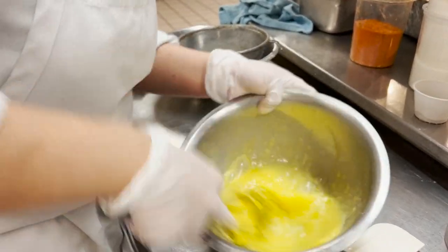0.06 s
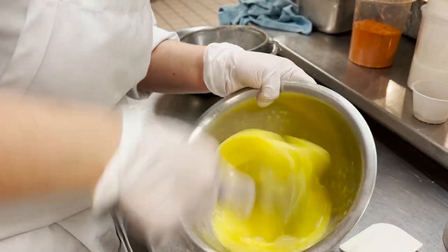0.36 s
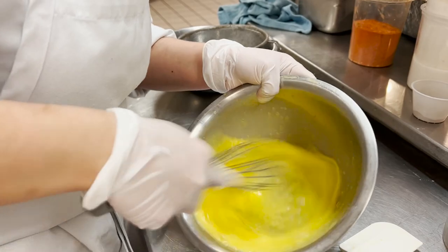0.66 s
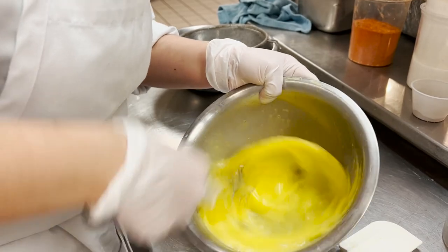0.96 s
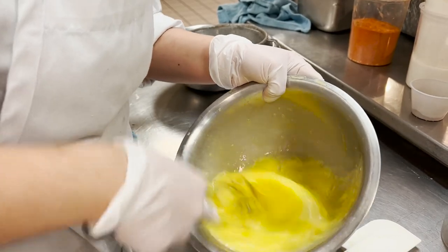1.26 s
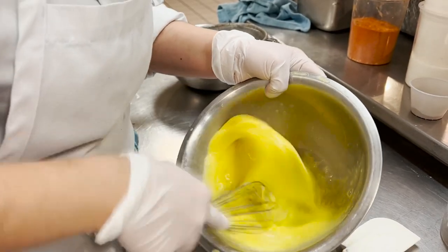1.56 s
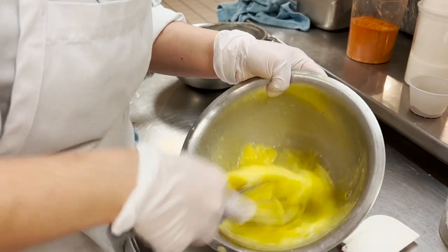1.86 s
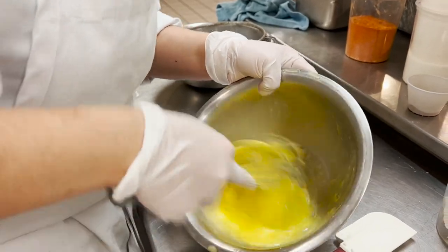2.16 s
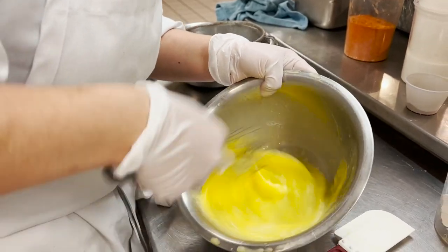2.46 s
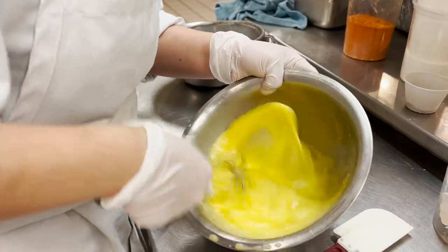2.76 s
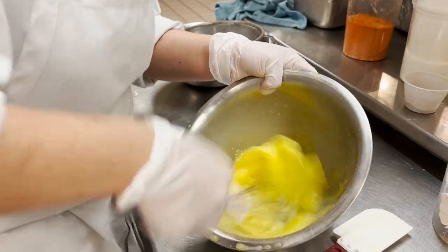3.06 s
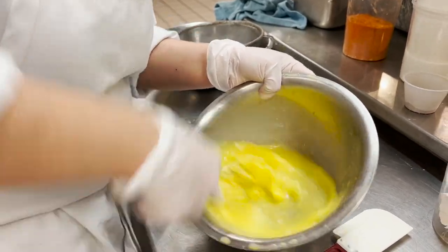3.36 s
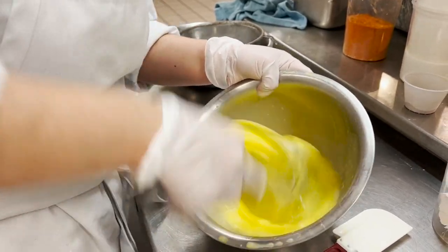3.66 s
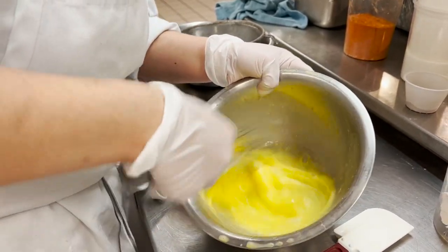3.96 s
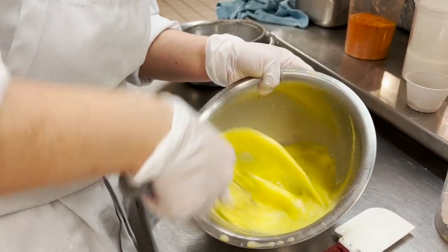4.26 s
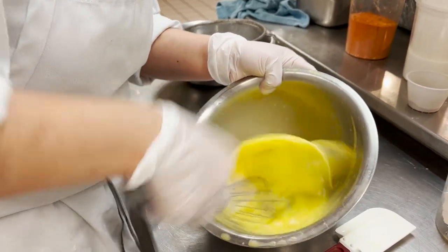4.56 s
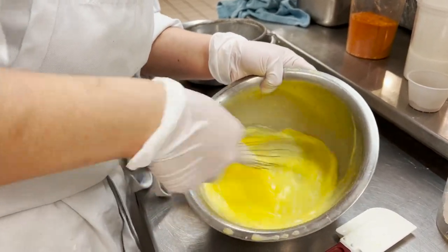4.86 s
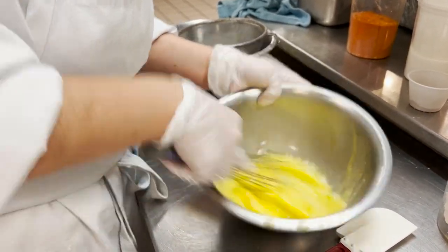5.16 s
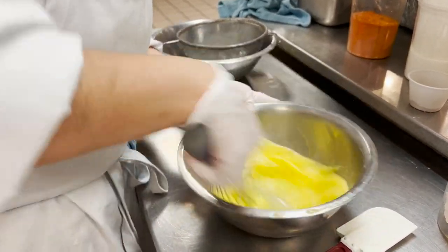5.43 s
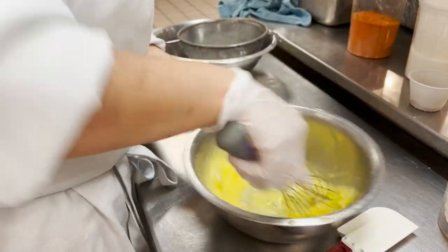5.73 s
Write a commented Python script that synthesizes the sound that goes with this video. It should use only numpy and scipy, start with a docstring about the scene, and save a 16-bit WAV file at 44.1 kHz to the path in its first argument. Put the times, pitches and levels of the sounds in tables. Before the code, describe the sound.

A wire whisk beats eggs in a steel bowl at about six strokes a second, each stroke a metallic click and clatter with a brief shimmer of wires. The egg squelches and plops softly underneath. Near the end the strokes turn into lighter, quicker, uneven taps as the bowl is set down with a faint scrape and a clink. Kitchen ventilation hums steadily behind, and the microphone is close.

```python
"""A wire whisk beats eggs in a hand-held steel bowl, about six strokes a second, then fades into lighter,
quicker, uneven taps as the bowl is set down with a scrape and a clink. Each stroke is a train of impacts
that excites the modes of bowl and wires; the egg damps the steel, and the freed wires ring on. The egg
squelches, and air pockets in it plop and snap. Kitchen ventilation hums behind as a diffuse field, and
a close pair of microphone ports hears it all."""
import sys
import numpy as np
from scipy import signal
from scipy.fft import rfft, irfft, next_fast_len
from scipy.io import wavfile
from scipy.ndimage import map_coordinates

SR = 44100
rng = np.random.default_rng(int(sys.argv[2]) if len(sys.argv) > 2 else 0)


def wrap_up_sound(samples):
    """Save the sound to the file named by the first command line argument, as 16-bit audio."""
    columns = np.atleast_2d(samples).T
    # keep every value between -1 and 1, then stretch to whole-number steps
    tamed = np.clip(columns, -1, 1)
    steps = np.round(tamed * 32767).astype(np.int16)
    wavfile.write(sys.argv[1], SR, steps)


N = 255471


def amp(db):
    """Amplitude ratio of a level in decibels."""
    return 10 ** (np.asarray(db) / 20)


def unit(x):
    """Normalisation to rms 1."""
    return x / np.sqrt(np.mean(x ** 2) + 1e-20)


def burst(x, db):
    """Energy normalisation: x gets the energy of 20 ms at this level."""
    return amp(db) * x * np.sqrt(.02 * SR / np.sum(x ** 2))


def add(track, start_s, x):
    """Superposition of x on the track, in place."""
    part = track[..., max(0, round(start_s * SR)):][..., :x.shape[-1]]
    part += x[..., :part.shape[-1]]


def along(points, hz):
    """Interpolation of (f/Hz, value) points on a logarithmic frequency axis."""
    f, values = np.transpose(points)
    return np.interp(np.log(hz + 1), np.log(f + 1), values)


def wobble(per_s):
    """Slow random modulation: a spline through Gaussian knots."""
    knots = rng.standard_normal(int(N * per_s / SR) + 4)
    return map_coordinates(knots, [np.arange(N) * per_s / SR])


def scattered(hz, octaves):
    """Log-normal scatter of a frequency."""
    return hz * 2 ** (octaves * rng.standard_normal())


def filtered(x, response):
    """Linear filtering: the spectrum of x times a complex frequency response."""
    n = x.shape[-1]
    padded = next_fast_len(n + 8192)
    hz = np.fft.rfftfreq(padded, 1 / SR)
    return irfft(rfft(x, padded) * response(hz), padded)[..., :n]


def coloured(x, spectrum):
    """Zero-phase shaping by a spectral envelope of (f/Hz, level/dB) points."""
    return filtered(x, lambda hz: amp(along(spectrum, hz)))


def resonate(x, modes):
    """Modal superposition: x drives damped resonators of alternating polarity."""
    def response(f):
        return sum((-1) ** k * amp(db) * 1j * f * width / (hz * hz - f * f + 1j * f * width)
                   for k, (hz, width, db) in enumerate(modes))
    return filtered(x, response)


def smear(x, t60, channels):
    """Statistical reverberation: noise carries the energy of x, falling 60 dB in t60 seconds."""
    decay = amp(-120 * np.arange(len(x)) / SR / t60)
    energy = np.abs(signal.fftconvolve(x ** 2, decay / decay.sum())[:len(x)])
    return np.sqrt(energy) * rng.standard_normal((channels, len(x)))


# Likeness of left and right in the diffuse field: f/Hz, coherence
COHERENCE = [(60, .99), (150, .95), (300, .85), (600, .5), (1000, .25), (6500, .2), (8500, .65),
             (10000, .9), (16000, .9)]

def diffuse(pair):
    """Diffuse-field coherence: two independent signals mix as mid and side into left and right."""
    def weights(hz):
        angle = np.arccos(np.clip(along(COHERENCE, hz), -1, 1)) / 2
        return np.array([np.cos(angle), np.sin(angle)])
    mid, side = filtered(pair, weights)
    return np.array([mid + side, mid - side])


def echoes(x, near_db, near_t60, room_db, room_t60):
    """Direct and reverberant sound: quick reflections in the bowl, then the kitchen's tail."""
    near = amp(near_db) * smear(x, near_t60, channels=2)
    room = amp(room_db) * smear(x, room_t60, channels=2)
    return x + diffuse(near + room)


def grains(spectrum, per_s, spread_db):
    """Shot noise: dense tiny impacts of uneven size, in stereo at rms 1."""
    hits = (rng.uniform(0, 1, (2, N)) < per_s / SR) * rng.standard_normal((2, N))
    sizes = amp(spread_db * rng.standard_normal((2, N)))
    return unit(diffuse(coloured(hits * sizes, spectrum)))


# Rumble and hiss of air in the hood: f/Hz, relative level/dB
HOOD_RUMBLE = [(20, -30), (40, -14), (65, -0.5), (88, -6), (120, 1.5), (145, -1), (240, 2), (310, -1),
               (410, -3), (600, -7.5), (850, -14), (1500, -13)]
HOOD_HISS = [(1000, -26), (1600, 1), (2500, 3.5), (4000, -2), (6500, -3), (8500, -9.5), (12000, -18),
             (16000, -41)]
# Duct and fan resonances: f/Hz, bandwidth/Hz, relative level/dB
DUCT_MODES = [(102.2, 1.14, -40), (112.5, 6, -45.5), (167.3, 2.9, -40.5), (200.9, 19.8, -28.5),
              (228.6, 22.5, -33.5), (265.7, 12.6, -37.5), (288.1, 4, -46.5), (360.4, 5.3, -42)]

def ventilation():
    """Flow noise: broadband from the hood, narrowband where fan and duct resonate."""
    def duct_response(f):
        power = sum(amp(2 * db) / width / (1 + ((f - hz) / (0.5 * width)) ** 2) ** 2
                    for hz, width, db in DUCT_MODES)
        return np.sqrt(power)
    rumble = coloured(rng.standard_normal((2, N)), HOOD_RUMBLE)
    rumble = filtered(rumble, lambda hz: 1 / (1 + (hz / 1700) ** 6))
    hiss = coloured(rng.standard_normal((2, N)), HOOD_HISS)
    hum = filtered(rng.standard_normal((2, N)), duct_response)
    return diffuse(amp(-27.5) * unit(rumble) + amp(-40) * unit(hiss) + amp(-27) * unit(hum))


# Spectrum of wire sliding on steel: f/Hz, relative level/dB
FRICTION_SPECTRUM = [(1500, 0), (4000, -5), (8000, -2), (11000, -4), (15500, -9)]

def scrape():
    """Stick-slip friction: the wires catch and slide on the steel as the bowl is set down."""
    level_db = np.interp(np.arange(N) / SR, [5.0, 5.1, 5.3], [-80, -43, -41])
    slips = amp(2.2 * wobble(60)) * grains(FRICTION_SPECTRUM, per_s=1600, spread_db=3.5)
    return amp(level_db) * slips


def damped_tone(t, hz, t60, rise_s):
    """Free vibration of one mode: a sinusoid that rises quickly and decays exponentially."""
    return np.sin(2 * np.pi * hz * t) * amp(-60 * t / t60) * (1 - np.exp(-t / rise_s))


def clink():
    """Impact excitation: one mode of the steel bowl rings briefly as it settles."""
    out, t = np.zeros((2, N)), np.arange(SR // 5) / SR
    note = amp(-17) * damped_tone(t, hz=2360, t60=.03, rise_s=0.00078)
    add(out, start_s=5.569, x=note)
    return out


# Spectrum of frothing egg: f/Hz, relative level/dB
FROTH_SPECTRUM = [(200, -24), (450, -5), (900, -3.5), (1550, 5.5), (2500, -9), (6000, -9), (9000, -16),
                  (15500, -28)]

def squelch():
    """Modulated shot noise: the flung egg froths as it falls back, most 70 ms after each stroke."""
    t = np.arange(N) / SR
    flow = 0.69 + sum(np.exp(-((t - start - .07) / 0.059) ** 2) for start, *_ in STROKES)
    level_db = -45.5 + 3.9 * wobble(25)
    return amp(level_db) * unit(flow) * grains(FROTH_SPECTRUM, per_s=2200, spread_db=2.5)


# Wet clicks of the egg: t/s, level/dB
WET_CLICKS = [(1.206, -20), (1.693, -19), (1.85, -14), (2.682, -20), (2.864, -11.5), (2.8944, -19),
              (3.3552, -11), (3.559, -13.5), (4.564, -20)]

def wet_clicks():
    """Transient radiation: small air pockets snap open, each a heavily damped tone and a noise pulse."""
    out, t = np.zeros((2, N)), np.arange(SR // 30) / SR
    for start, db in WET_CLICKS:
        hz = scattered(1300, octaves=0.21)
        pop = np.sin(2 * np.pi * hz * t) * np.exp(-t * hz / 2)
        snap = 0.46 * rng.standard_normal(len(t)) * np.exp(-t / 0.00059)
        snap = echoes(snap, near_db=0, near_t60=.03, room_db=-15, room_t60=.2)
        add(out, start, amp(db) * (pop + snap) / 2)
    return out


# Air pockets that the whisk traps in the egg: t/s, level/dB, f/Hz
AIR_POCKETS = [(0.6, -10, 404), (0.944, -15.5, 494), (1.421, -21, 504), (1.591, -11.5, 391),
               (1.911, -18, 407), (2.253, -17.5, 426), (3.333, -18, 450), (3.725, -19, 522),
               (5.343, -18.5, 685)]

def plops():
    """Bubble resonance: trapped air rings low and is quickly damped by the viscous egg."""
    out, t = np.zeros(N), np.arange(SR // 8) / SR
    for start, db, hz in AIR_POCKETS:
        add(out, start, amp(db) * damped_tone(t, hz, t60=0.085, rise_s=0.00082))
    return out


def contact_force(t, length_s, count=8):
    """Impact train: a sharp first touch, then wire after wire, swelling early, each chattering."""
    place = (np.arange(count) + rng.uniform(0, 1, count)) / count
    swell = 1 + 1.2 * np.sin(np.pi * place ** .75) ** 2
    sizes = swell * amp(2 * rng.standard_normal(count))
    place[0], sizes[0] = 0, amp(7)
    taps = np.bincount((place * length_s * SR).astype(int), sizes, len(t))
    return smear(taps, t60=0.0075, channels=1)[0]


def with_mode(sound, force, hz, width_hz, mode_db):
    """Selective excitation: where the wires land decides which mode stands out of the rest."""
    mode = resonate(force, [(hz, width_hz, 0)])
    return unit(sound) + amp(mode_db) * unit(mode)


def wire_twang(force):
    """Damped wire modes: every loop is bent differently, so each stroke excites its own set."""
    modes = [(hz, 140, 0) for hz in rng.uniform(2500, 15500, size=18)]
    return amp(-7) * unit(resonate(force, modes))


# Spectrum of the freely ringing wires: f/Hz, relative level/dB
RING_SPECTRUM = [(1200, -6), (2500, -8.5), (5300, -2), (6500, 2), (7900, -1), (9000, -8), (15000, -31)]

def wire_ring(t, t60):
    """Modal overlap: the freed loops ring in so many close modes that they blur into a shimmer."""
    shimmer = diffuse(coloured(rng.standard_normal((2, len(t))), RING_SPECTRUM))
    return unit(shimmer) * amp(-60 * t / t60) * (1 - np.exp(-t / 0.0017))


# Modes of the egg-filled bowl and of its steel wall: f/Hz, bandwidth/Hz, relative level/dB
BOWL_MODES = [(290, 70, -4), (400, 90, 0), (510, 90, -4), (630, 100, -7), (860, 160, -10)]
WALL_MODES = [(734, 50, -10), (995, 97, -1), (1228, 107, 4), (1605, 270, 5), (1790, 290, 2.5),
              (2297, 280, 4.5)]
# Spectra of wires striking steel, upper middle range and treble: f/Hz, relative level/dB
CLATTER_SPECTRUM = [(1700, -21), (2700, -1.5), (3200, -1.5), (4000, -0.5), (5200, -9.5), (6000, -18),
                    (7500, -9.5)]
CLICK_SPECTRUM = [(4000, -7.5), (5800, -2.5), (6600, -0.5), (7700, -1.5), (8700, 0), (11000, 0.5),
                  (13000, -19), (15500, -14)]
# Whisk strokes: t/s, contact duration/s, level/dB, bareness (0 deep in egg, 1 on bare steel)
STROKES = [(0.0538, 0.011, -21.9, 0.57), (0.2542, 0.007, -22, 0.78), (0.4254, 0.011, -19.5, 0.4),
           (0.598, 0.017, -19.5, 0.21), (0.765, 0.012, -19, 0.64), (0.9338, 0.018, -20, 0.19),
           (1.0965, 0.015, -19, 0.53), (1.2592, 0.018, -25.5, 0.19), (1.4175, 0.012, -19, 0.25),
           (1.5855, 0.015, -20.5, 0.14), (1.743, 0.01, -18.9, 0.4), (1.907, 0.014, -24.5, 0.19),
           (2.0889, 0.0072, -22.5, 0.5), (2.245, 0.011, -22.5, 0.32), (2.4126, 0.014, -23, 0.33),
           (2.5854, 0.011, -23.5, 0.6), (2.766, 0.006, -32.5, 0.24), (2.928, 0.016, -25, 0.13),
           (3.1055, 0.017, -25.5, 0.44), (3.329, 0.017, -21, 0.45), (3.5303, 0.021, -23, 0.47),
           (3.719, 0.019, -23, 0.32), (3.899, 0.0088, -21, 0.73), (4.0808, 0.015, -20.5, 0.54),
           (4.2429, 0.013, -22.5, 0.89), (4.4204, 0.012, -25, 0.56), (4.597, 0.024, -21, 0.34),
           (4.778, 0.018, -24.5, 0.17), (4.957, 0.014, -23, 0.31), (5.0827, 0.019, -34, 0.29),
           (5.219, 0.013, -29.5, 0.56), (5.3387, 0.0087, -33.5, 0.6), (5.4188, 0.008, -33.5, 0.67),
           (5.5257, 0.012, -31, 0.41), (5.566, 0.009, -31, 0.098), (5.63, 0.007, -40, 0.75),
           (5.7396, 0.023, -30, 0.64), (5.773, 0.013, -31.7, 0.18)]

def whisk():
    """Impact and damping: deep in egg the wall's clang leads; on bare steel the wires click and ring."""
    out, t = np.zeros((2, N)), np.arange(SR // 4) / SR
    for start, length_s, db, bare in STROKES:
        wall_hz, wire_hz = scattered(1450, octaves=0.26), scattered(7510, octaves=0.078)
        force = contact_force(t, length_s)
        # the middle range lingers in the bowl; the treble arrives mostly direct
        body = echoes(force, near_db=2.5, near_t60=0.086, room_db=-4, room_t60=0.24)
        bright = echoes(force, near_db=-6, near_t60=.045, room_db=-18, room_t60=.22)
        twang = wire_twang(force)
        knock = resonate(body, BOWL_MODES)
        clang = with_mode(resonate(body, WALL_MODES), force, wall_hz, width_hz=116, mode_db=-4.5)
        clatter = coloured(unit(body) + twang / 2, CLATTER_SPECTRUM)
        click = coloured(unit(bright) + twang, CLICK_SPECTRUM)
        click = with_mode(click, force, wire_hz, width_hz=83, mode_db=-9)
        ring = wire_ring(t, t60=0.26 + 0.19 * bare)
        add(out, start, burst(knock, -14.5 + 0.44 * db))  # cushioned by the egg, it grows slowly
        add(out, start, burst(clang, db + 4.07 - 12 * bare))
        add(out, start, burst(clatter, db + 1.73 - 4.5 * bare))
        add(out, start, burst(click, db - 3 + 11.65 * bare))
        add(out, start, ring * amp(db - 15.5 + 13 * bare))
    return out


def scene():
    """Superposition of whisk, bowl, egg and ventilation."""
    return whisk() + clink() + plops() + wet_clicks() + squelch() + scrape() + ventilation()


# Phase difference between the ports: f/Hz, lead of left over right/rad
PORT_PHASE = [(900, 0), (1800, -.7), (2500, 1.2), (5500, 1.1), (7500, 1.1), (8400, -.1), (9800, -2.6),
              (10600, -3.6), (11700, -6.1), (12400, -6.6), (13400, -9), (14200, -9.9), (15300, -12.5)]
# Level difference between the ports: f/Hz, left minus right level/dB
PORT_BALANCE = [(150, 0.15), (700, 2.1), (2400, 0.92), (4000, 2.9), (6300, 8), (8300, .3)]

def record(dry):
    """Level and phase differences between two ports, then soft saturation and a band limit."""
    def ports(hz):
        tilt = amp(along(PORT_BALANCE, hz) / 2)
        lag = np.exp(-1j * along(PORT_PHASE, hz))
        return np.array([tilt, lag / tilt]) / np.sqrt((tilt ** 2 + tilt ** -2) / 2)
    ceiling, top_hz = .88, 15850
    heard = filtered(dry, ports)
    rounded = heard / (1 + (heard / ceiling) ** 8) ** (1 / 8)
    return filtered(rounded, lambda hz: 1 / (1 + (hz / top_hz) ** 200))


dry = scene()
out = record(dry)
wrap_up_sound(out)
```